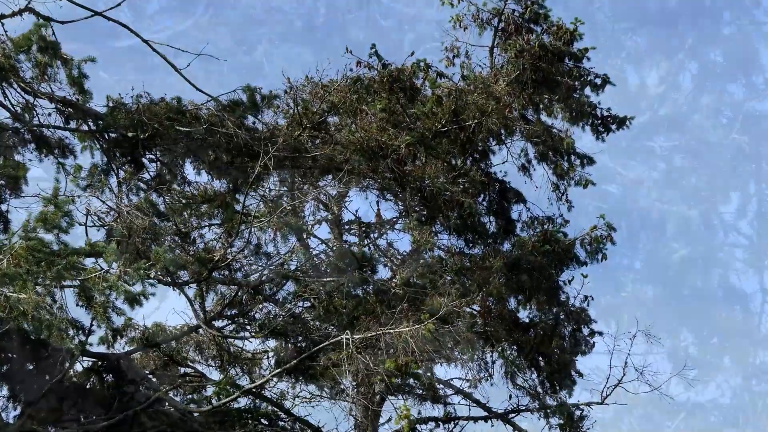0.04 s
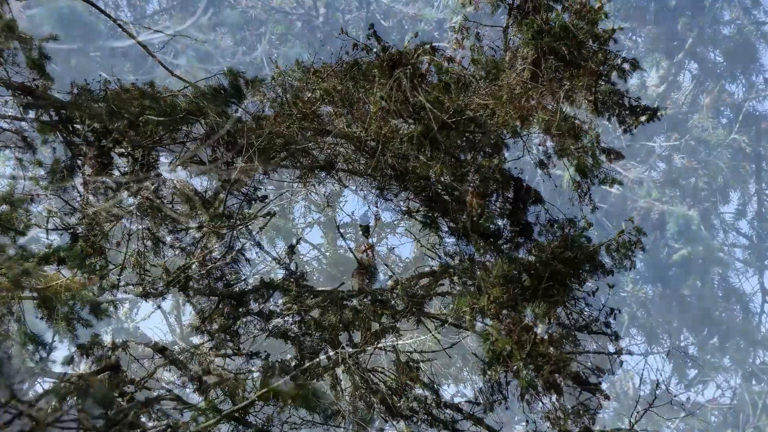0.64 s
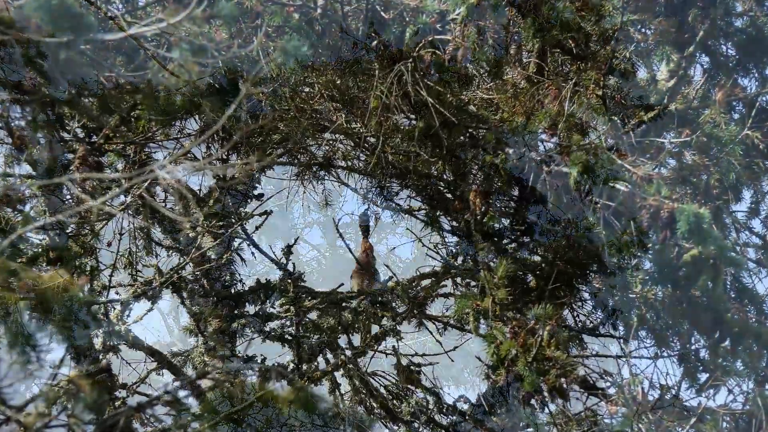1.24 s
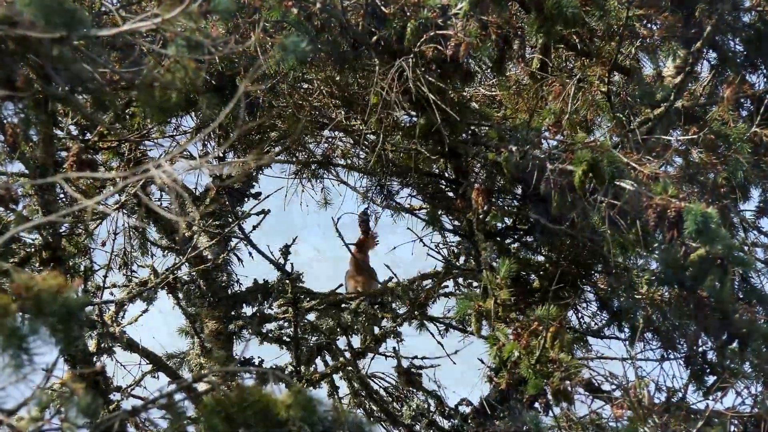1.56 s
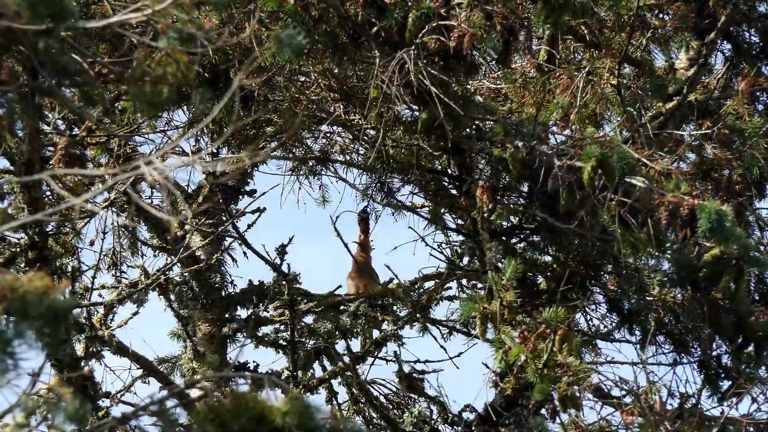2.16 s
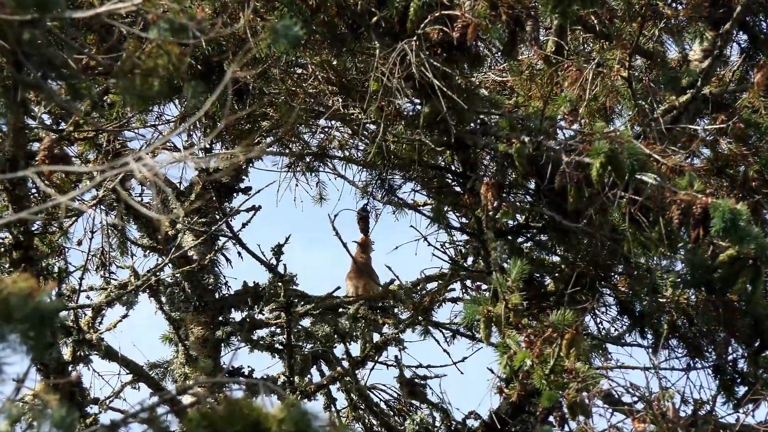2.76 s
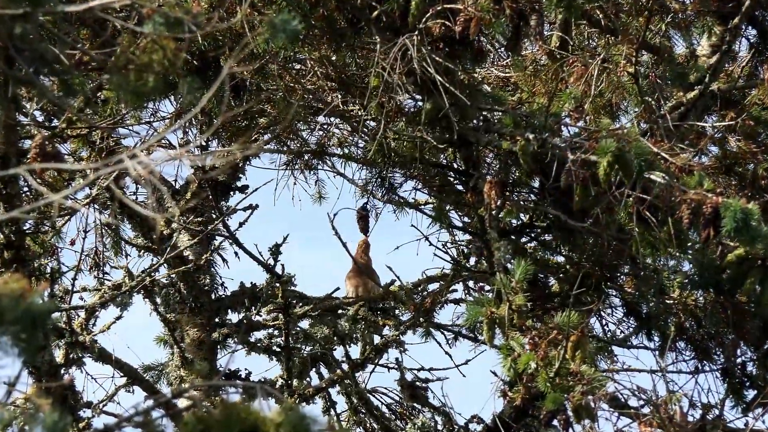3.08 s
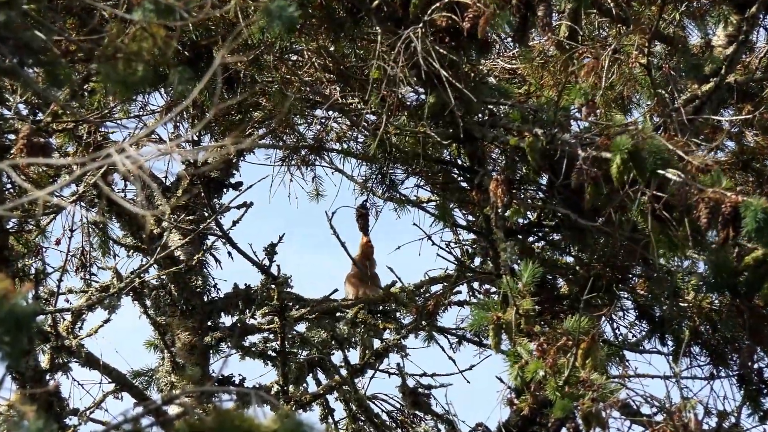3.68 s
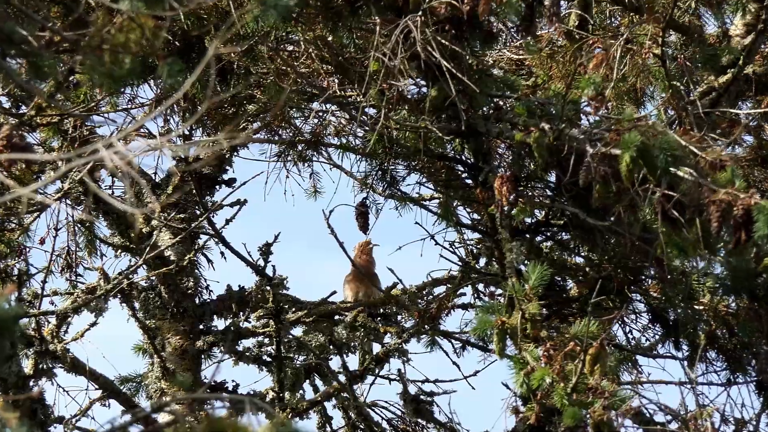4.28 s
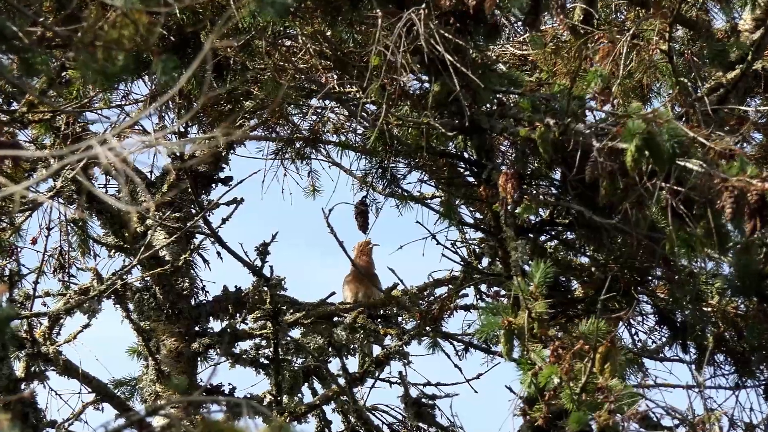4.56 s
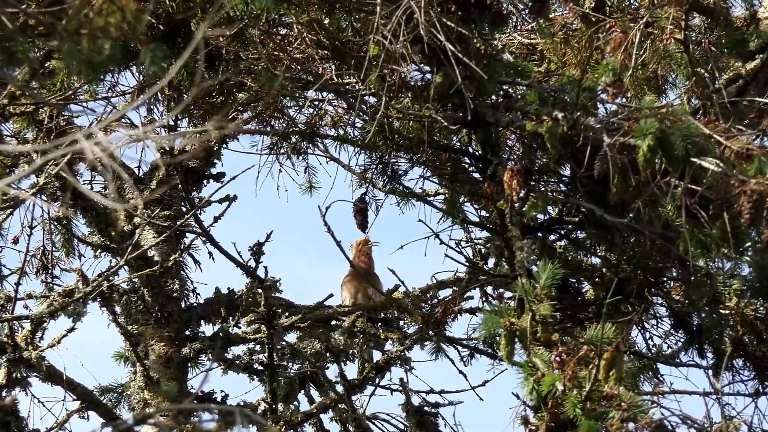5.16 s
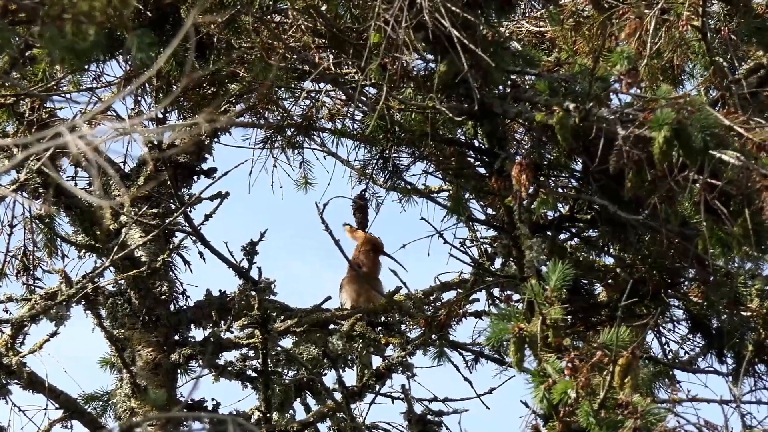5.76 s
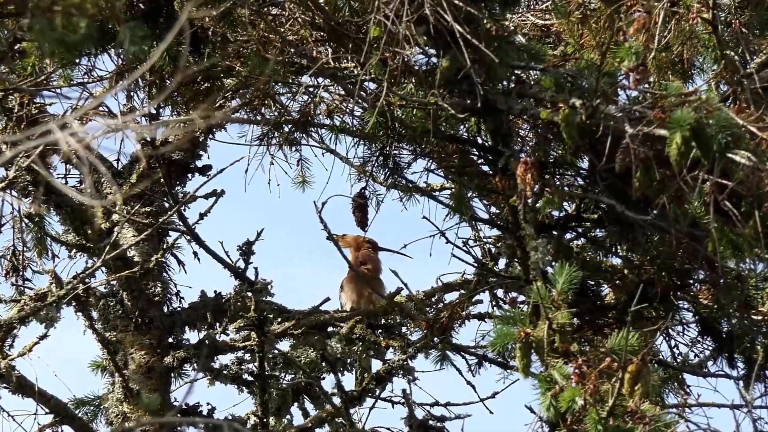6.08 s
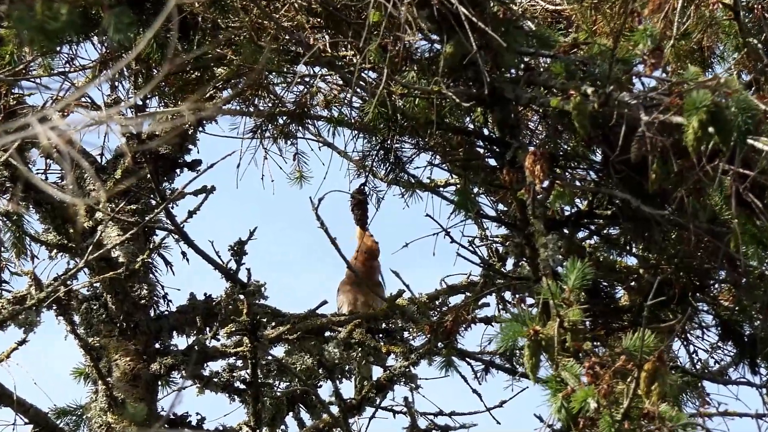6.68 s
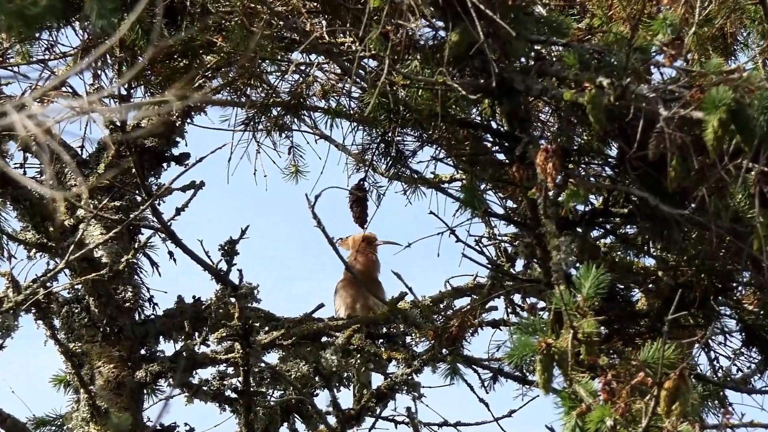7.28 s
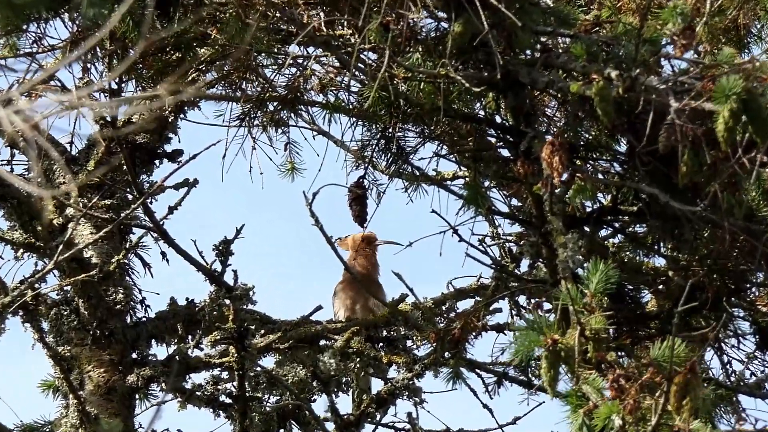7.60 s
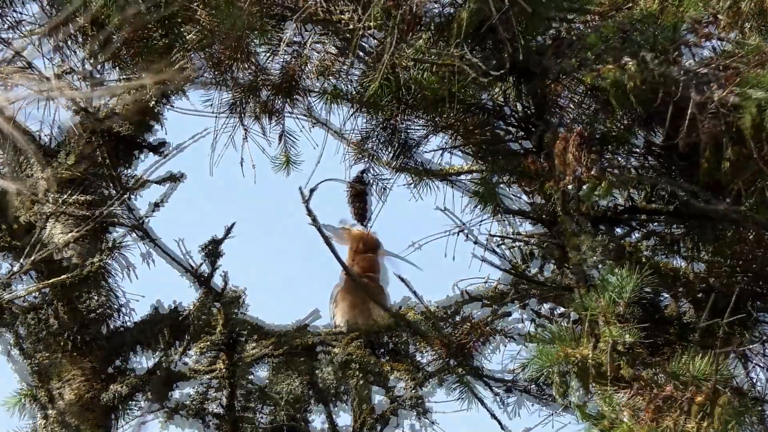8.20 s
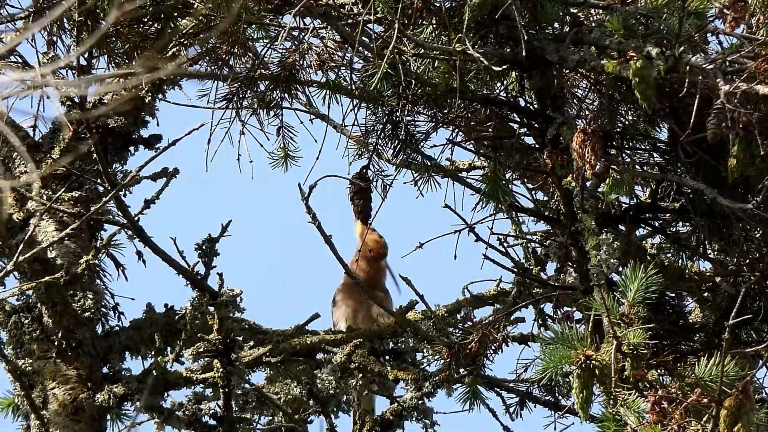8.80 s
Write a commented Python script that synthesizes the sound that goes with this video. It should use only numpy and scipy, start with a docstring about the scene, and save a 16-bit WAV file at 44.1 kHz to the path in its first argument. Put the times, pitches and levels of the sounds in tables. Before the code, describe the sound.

After silence, faint wind fades in at about 0.8 seconds: a low rumble with soft hiss in the trees and occasional deep swells. A hoopoe straight ahead is the loudest sound, calling at about 1.2, 3.4, 5.4 and 6.8 seconds. Each phrase is three quick, soft, almost pure hoots on one fairly low pitch, lasting half a second and echoing lightly through the wood; the first phrase ends on a weaker, clipped hoot. Small birds chirp very faintly far off, mostly between 1 and 4 seconds, with a few thin, high notes after 6.5. Faint handling ticks, bumps and rustles are scattered close to the microphone from 1.6 seconds on. At 6.3 seconds comes one sharp, briefly ringing double snap nearby. The wind dips around 8.3 seconds, followed by a couple of dull bumps and a tick before the end near 9 seconds.

```python
"""In a wood, a hoopoe on a spruce branch gives four phrases of three soft hoots, almost pure tones from its
swollen throat, which echo among the trees. Small birds chirp far off. Close by are faint handling ticks, bumps
and rustles, and one sharp, ringing double snap. Wind rumbles and hisses in the trees. After a silent start the
background fades in, and it dips briefly near the end."""
import sys
import numpy as np
from scipy import signal
from scipy.fft import rfft, irfft, next_fast_len
from scipy.io import wavfile

SR = 44100
rng = np.random.default_rng(int(sys.argv[2]) if len(sys.argv) > 2 else 0)


def store_pcm(level_fs):
    """Save levels as 16-bit WAV."""
    pcm = np.round(np.clip(level_fs, -1, 1) * 32767).astype(np.int16)
    wavfile.write(sys.argv[1], SR, np.atleast_2d(pcm).T)


N = 394254

# (harmonic number, level [dB])
HOOT_HARMONICS = [(1, 0.5), (2, -41.5), (3, -39.5), (4, -41.5), (5, -52), (7, -59.5)]
FULL_HOOT_S, SCOOP_HZ_PER_S, DROOP_HZ = .102, 475, 12
WAVER_HZ, SHIMMER_DB = 1.2, .15
# per second missing from a full hoot: weaker, lower, more droop
SHORT_DB_PER_S, SHORT_HZ_PER_S, SHORT_DROOP_HZ_PER_S = 190, 550, 800

def hoot(length_s, release_s, hz, db):
    """Near-pure tone from the swollen throat: swells as the pitch rises, then shuts and droops."""
    t = seconds(length_s)
    crest_s, missing_s = length_s - release_s, FULL_HOOT_S - length_s
    rise = np.minimum(t / crest_s, 1)
    fall = np.clip((t - crest_s) / release_s, 0, 1)
    envelope = rise * np.cos(np.pi / 2 * fall) ** .87
    gain = from_db(db - SHORT_DB_PER_S * missing_s + SHIMMER_DB * drift(140, len(t)))
    scoop = SCOOP_HZ_PER_S * np.maximum(crest_s - t, 0)
    droop = (DROOP_HZ + SHORT_DROOP_HZ_PER_S * missing_s) * fall ** 2
    pitch = hz - SHORT_HZ_PER_S * missing_s - scoop - droop + WAVER_HZ * drift(100, len(t))
    phase = 2 * np.pi * np.cumsum(pitch) / SR
    tone = sum(from_db(level) * np.sin(k * phase) for k, level in HOOT_HARMONICS)
    return envelope * gain * tone


# (start [s], level [dB], third hoot delay [s], third hoot length [s])
HOOT_PHRASES = [(1.186, -9.2, .371, .052), (3.404, -7.25, .372, .098), (5.409, -8.5, .379, .093),
                (6.785, -7.1, .375, .099)]
# hoots 1-3 of a phrase: (release [s], base pitch [Hz], level offset [dB])
HOOT_SHAPES = [(.032, 591.7, -.9), (.049, 594.6, 0), (.042, 593.9, -.3)]
SECOND_DELAY_S = .184

def hoopoe():
    """Phrases of two full hoots and a shorter third."""
    out = np.zeros(N)
    for start, db, third_delay, third_length in HOOT_PHRASES:
        timing = [(0, FULL_HOOT_S), (SECOND_DELAY_S, FULL_HOOT_S), (third_delay, third_length)]
        for (delay, length), (release, hz, offset_db) in zip(timing, HOOT_SHAPES):
            add(out, start + delay, hoot(length, release, hz, db + offset_db))
    return out


# (delay [s], level [dB])
TREE_REFLECTIONS = [(.03273, -21.5), (.06958, -27), (.07756, -25.5), (.13121, -33), (.17257, -36),
                    (.262, -36)]

def tree_echoes(x):
    """Single reflections from the closest trees."""
    out = np.zeros(N)
    for delay, db in TREE_REFLECTIONS:
        add(out, delay, from_db(db) * x)
    return out


def wood_reverb(x, t60_s, build_s):
    """Diffuse return from many trunks: builds up, then dies away."""
    t = seconds(1.2)
    envelope = from_db(-60 * t / t60_s) * (1 - np.exp(-t / build_s))
    response = rng.standard_normal(len(t)) * envelope
    return signal.fftconvolve(x, response / np.linalg.norm(response))[:N]


# (frequency [Hz], density [dB])
SCATTER_SPECTRUM = [(150, -10.5), (400, -5), (1100, -6), (2200, -11), (3300, -7.5), (4200, -5.5),
                    (5300, -15.5), (7000, -21.5), (9000, -21), (11000, -30.5), (15000, -37)]

def clicks(rows, crack_s, scatter_db, scatter_t60_s, modes=()):
    """Brief pitched cracks, each followed by dying scatter and any ringing modes."""
    out, t = np.zeros(N), seconds(.3)
    for start, db, hz in rows:
        crack = t / crack_s * np.exp(1 - t / crack_s) * np.sin(2 * np.pi * hz * t)
        body = sum(from_db(level) * ring(t, f, t60) * rng.choice([-1, 1]) for f, level, t60 in modes)
        scatter = coloured(rng.standard_normal(len(t)), SCATTER_SPECTRUM)
        scatter *= from_db(scatter_db - 60 * t / scatter_t60_s)
        add(out, start, from_db(db) * (crack + body + scatter))
    return out


# snap and rebounds: (time [s], level [dB], pitch [Hz])
SNAP_CRACKS = [(6.2615, -15, 3180), (6.2631, -11.5, 4060), (6.269, -26, 3700), (6.2803, -11, 4070),
               (6.2922, -24, 4300), (6.310, -26.5, 4100)]
# (frequency [Hz], level [dB], t60 [s])
SNAP_RESONANCES = [(865, -33, .13), (1153, -31, .13), (2094, -34, .09), (2729, -36, .12), (3316, -31, .12),
                   (3910, -31, .13), (3974, -29, .13), (4080, -25, .13), (4146, -28, .13), (4256, -28, .13),
                   (4425, -30, .13), (4598, -35, .13)]

def snap():
    """Sharp double snap: the snapped thing rings and the wood echoes it."""
    direct = clicks(SNAP_CRACKS, crack_s=.0005, scatter_db=-14.5, scatter_t60_s=.14,
                    modes=SNAP_RESONANCES)
    return direct + from_db(-30) * wood_reverb(direct, t60_s=1.1, build_s=.02)


# (time [s], level [dB], pitch [Hz])
HANDLING_TICKS = [(1.667, -30.5, 2000), (1.879, -38, 3600), (2.614, -40, 3500), (2.878, -36, 3030),
                  (3.144, -37, 3070), (3.385, -33.5, 4400), (3.4385, -34.5, 3450), (3.8526, -39, 3480),
                  (4.5605, -32, 1890), (4.9007, -34, 3500), (4.938, -43, 4630), (5.6325, -40, 3600),
                  (7.9567, -40.5, 3660), (8.8327, -37, 3100)]
# (time [s], level [dB], pitch [Hz])
HANDLING_BUMPS = [(1.662, -38, 240), (4.560, -38, 330), (4.605, -39, 290), (8.455, -35, 310),
                  (8.595, -30, 125)]

def handling():
    """Bright ticks and dull bumps from handling close by."""
    ticks = clicks(HANDLING_TICKS, crack_s=.00035, scatter_db=-8, scatter_t60_s=.05)
    bumps = clicks(HANDLING_BUMPS, crack_s=.007, scatter_db=-34, scatter_t60_s=.05)
    return ticks + bumps


# (start [s], length [s], pitch [Hz], level [dB])
CHIRPS = [(.92, .075, 1410, -47), (1.70, .065, 745, -41), (1.72, .18, 2160, -54), (3.0, .055, 890, -37.5),
          (3.02, .1, 2740, -49), (3.30, .11, 3160, -49.5), (3.94, .08, 3180, -51), (6.48, .11, 7750, -57.5),
          (7.27, .13, 7750, -58.5), (8.16, .07, 7600, -62), (8.47, .09, 5800, -57)]
GLIDE_SHARE, WARBLE_SHARE = .03, .022
RUN_START_S, RUN_STEP_S, RUN_NOTE_S, RUN_HZ, RUN_SPREAD, RUN_DB = 1.77, .2, .08, 3150, .045, -51.5

def songbirds():
    """Warbling chirps that glide down a little; one bird adds a loose run of seven."""
    run = []
    for k, (late, high) in enumerate(rng.standard_normal((7, 2))):
        start = RUN_START_S + RUN_STEP_S * (k + late / 10)
        run.append((start, RUN_NOTE_S, RUN_HZ * (1 + RUN_SPREAD * high), RUN_DB))
    out = np.zeros(N)
    for start, length, hz, db in list(CHIRPS) + run:
        t = seconds(length)
        pitch = hz * (1 + GLIDE_SHARE * (.5 - t / length) + WARBLE_SHARE * drift(260, len(t)))
        envelope = from_db(db) * np.sin(np.pi * t / length)
        add(out, start, envelope * np.sin(2 * np.pi * np.cumsum(pitch) / SR))
    return out


# (centre [s], length [s], level [dB])
RUB_SWELLS = [(1.64, 0.24, -48.5), (1.85, 0.31, -50.5), (2.4, 0.19, -48), (2.55, 2.0, -52.5),
              (3.44, 0.19, -51), (4.91, 0.052, -62), (8.05, 0.26, -54), (8.5, 0.14, -47)]
# (frequency [Hz], density [dB])
RUSTLE_SPECTRUM = [(150, -25.5), (500, 0), (1500, 3.5), (2500, -1.5), (3400, -1.5), (4400, -3), (5600, -13),
                   (8000, -19), (15000, -19.5), (18000, -51)]

def rustling(grains_per_s=900, grain_spread_db=3, soft_share=.78):
    """Rubbing close by: soft hiss with many tiny crackles."""
    sizes = from_db(grain_spread_db * np.minimum(rng.exponential(1, N), 4)) * rng.choice([-1, 1], N)
    grain_chance = grains_per_s * from_db(4 * drift(40)) / SR
    crackle = coloured(sizes * (rng.random(N) < grain_chance), RUSTLE_SPECTRUM)
    soft = air_noise(RUSTLE_SPECTRUM, flutter_db=3, rate_hz=45)
    texture = np.sqrt(soft_share) * soft + np.sqrt(1 - soft_share) * crackle
    return swells(RUB_SWELLS, rest_db=-68) * texture


# (time [s], level [dB])
WIND_STRENGTH = [(1.2, -0.5), (1.75, 1), (3.3, 0.5), (4.3, 0), (8.2, -.5), (8.46, 1), (8.94, -0.5)]
# spectra: (frequency [Hz], density [dB])
RUMBLE_SPECTRUM = [(5, -31.5), (15, -9), (30, -8), (42, -9), (55, -5), (68, -3.5), (82, -2), (100, -3),
                   (125, -6), (160, -13.5), (240, -17.5), (500, -56.5), (1500, -110)]
TREE_SPECTRUM = [(80, -20), (150, -13), (220, -9.5), (320, 1.5), (420, -2.5), (560, -0.5), (760, -6),
                 (1100, -3), (1450, -8.5), (2000, -17.5), (2800, -25.5), (4500, -38), (8000, -69.5)]
HISS_SPECTRUM = [(1000, 1), (2500, 1.5), (3500, -2.5), (4400, -0.5), (5200, -3), (7000, -4), (10000, -5),
                 (14500, -6), (16000, -8.5), (18000, -42)]

def wind():
    """Rumble and rush of the trees follow the wind's strength, over a fine, nearly steady hiss."""
    strength_db = np.interp(np.arange(N) / SR, *np.transpose(WIND_STRENGTH))
    rumble = from_db(strength_db - 41) * air_noise(RUMBLE_SPECTRUM, flutter_db=1, rate_hz=12)
    trees = from_db(strength_db - 43.5) * air_noise(TREE_SPECTRUM, flutter_db=.92, rate_hz=16)
    hiss = from_db(-56) * air_noise(HISS_SPECTRUM, flutter_db=1, rate_hz=.94)
    return rumble + trees + hiss


# (centre [s], level [dB])
BOOM_SWELLS = [(2.42, -36), (3.76, -37.5), (5.06, -40), (5.68, -40.5), (6.8, -37.5), (7.58, -38.5),
               (8.86, -36)]
# (centre [s], length [s], level [dB])
GUST_SWELLS = [(1.7, 0.18, -55), (2.6, 1.8, -54.5), (4.6, .15, -46), (6.05, 0.17, -44.5), (7.99, 0.18, -43),
               (8.52, 0.31, -41.5)]
# spectra: (frequency [Hz], density [dB])
BOOM_SPECTRUM = [(25, -58), (38, -22), (48, -3.5), (55, 9.5), (62, -3), (80, -32.5), (160, -100)]
GUST_SPECTRUM = [(30, -42), (70, -20.5), (130, 4), (200, -2.5), (290, 3), (400, -7.5), (600, -15),
                 (1000, -18), (3000, -51), (6000, -100)]

def gusts(boom_s=.25):
    """Low gusts and deep booms swell now and then in the wind."""
    boom_gain = swells([(centre, boom_s, db) for centre, db in BOOM_SWELLS], rest_db=-45)
    boom = boom_gain * air_noise(BOOM_SPECTRUM, flutter_db=1, rate_hz=8)
    gust = swells(GUST_SWELLS, rest_db=-53.5) * air_noise(GUST_SPECTRUM, flutter_db=4, rate_hz=25)
    return boom + gust


# (frequency [Hz], side relative to mid [dB])
STEREO_WIDTH = [(40, -39), (125, -36), (320, -30), (1100, -28), (2200, -17), (4200, -15), (6000, -13.5),
                (9000, -11), (15000, -11)]

def air_noise(spectrum, flutter_db, rate_hz):
    """Fluttering noise at two close capsules, which differ mostly in the treble."""
    padded = next_fast_len(N, True)
    mid, side = rfft(rng.standard_normal((2, padded))) * bin_gains(spectrum, padded)
    side *= bin_gains(STEREO_WIDTH, padded)
    stereo = irfft([mid + side, mid - side], padded)[:, :N]
    return rms_one(stereo) * from_db(flutter_db * drift(rate_hz))


OPEN_S, FADE_IN_S, FADE_IN_DB = .7546, 1, -6.5
DIP_AT_S, DIP_HALF_S, DIP_DB = 8.27, .52, -5

def background_gain():
    """The background fades in and later dips briefly."""
    t = np.arange(N) / SR
    opening = np.clip(1 - (t - OPEN_S) / FADE_IN_S, 0, 1)
    dip = np.maximum(1 - np.abs(t - DIP_AT_S) / DIP_HALF_S, 0)
    return from_db(FADE_IN_DB * opening + DIP_DB * dip)


def swells(rows, rest_db):
    """Gain of bell-shaped swells over a resting level; lengths at half power."""
    t = np.arange(N) / SR
    power = sum(from_db(db) ** 2 * .5 ** ((2 * (t - centre) / length) ** 2)
                for centre, length, db in rows)
    return np.sqrt(from_db(rest_db) ** 2 + power)


def from_db(db):
    """Decibels to gain."""
    return 10 ** (np.asarray(db) / 20)


def rms_one(x):
    """Scale to rms 1."""
    return x / np.sqrt(np.mean(x ** 2) + 1e-20)


def seconds(length_s):
    """Time axis."""
    return np.arange(int(length_s * SR)) / SR


def add(out, start_s, sound):
    """Mix a sound in at its time."""
    i = int(start_s * SR)
    out[i:i + len(sound)] += sound[:N - i]


def drift(rate_hz, size=N):
    """Random wander of spread 1."""
    knots = rng.standard_normal(int(size / SR * rate_hz) + 3)
    return np.interp(np.arange(size) / SR * rate_hz, np.arange(len(knots)), knots) * np.sqrt(3 / 2)


def ring(t, hz, t60_s):
    """Decaying sine."""
    return np.sin(2 * np.pi * hz * t) * from_db(-60 * t / t60_s)


def bin_gains(spectrum, size):
    """Gain per FFT bin, interpolated in log frequency."""
    hz, db = np.transpose(spectrum)
    bin_hz = np.maximum(np.fft.rfftfreq(size, 1 / SR), 1)
    return from_db(np.interp(np.log(bin_hz), np.log(hz), db))


def coloured(x, spectrum):
    """Filter by a spectrum, to rms 1."""
    padded = next_fast_len(len(x), True)
    return rms_one(irfft(rfft(x, padded) * bin_gains(spectrum, padded), padded)[:len(x)])


def panned(x, pan_db, lag_s=0):
    """Off-centre source: positive values make the left louder and earlier."""
    t = np.arange(N) / SR
    return np.array([from_db(sign * pan_db / 2) * np.interp(t + sign * lag_s / 2, t, x)
                     for sign in (1, -1)])


def scene():
    """Hoopoe straight ahead, small birds deep in the wood, clicks close by, wind behind."""
    hoots, song = hoopoe(), songbirds()
    echoes = tree_echoes(hoots) + from_db(-30) * wood_reverb(hoots, t60_s=1.3, build_s=.015)
    far = from_db(-.5) * song + from_db(-2.5) * wood_reverb(song, t60_s=.49, build_s=.0051)
    birds = panned(from_db(-.3) * hoots + echoes + far, pan_db=-.1)
    close = panned(handling() + snap(), pan_db=.1, lag_s=3e-6)
    background = (wind() + gusts() + rustling()) * background_gain()
    return birds + close + background


CUTOFF_HZ = 15650

def record(dry):
    """Silence until OPEN_S; a steep low-pass cuts the top."""
    gate = np.clip((np.arange(N) / SR - OPEN_S) / .004, 0, 1)
    low_pass = signal.ellip(10, .1, 90, CUTOFF_HZ, fs=SR, output="sos")
    return signal.sosfilt(low_pass, dry * gate)


dry = scene()
out = record(dry)
store_pcm(out)
```